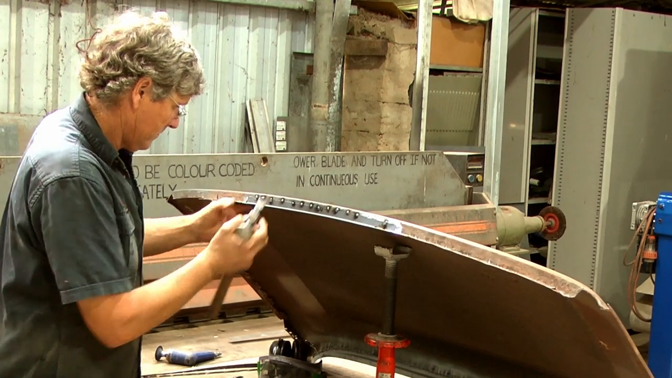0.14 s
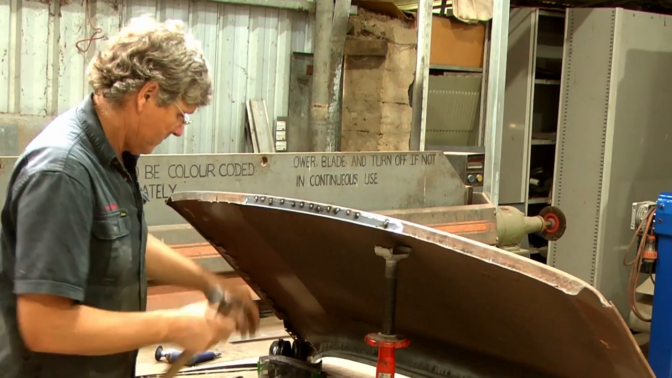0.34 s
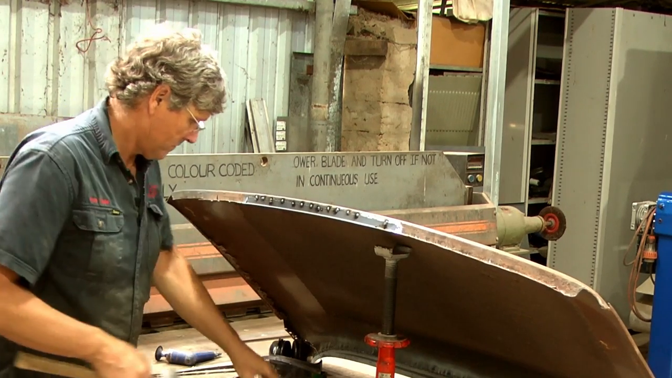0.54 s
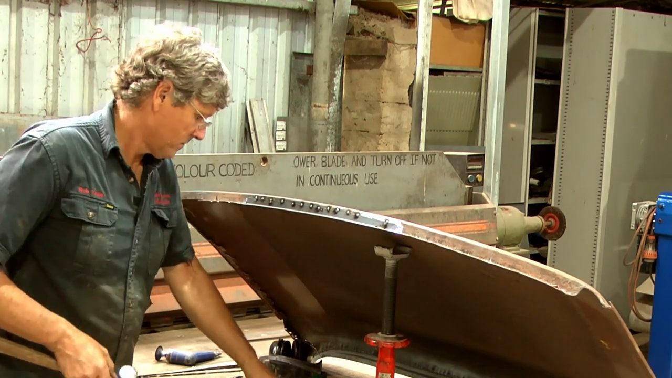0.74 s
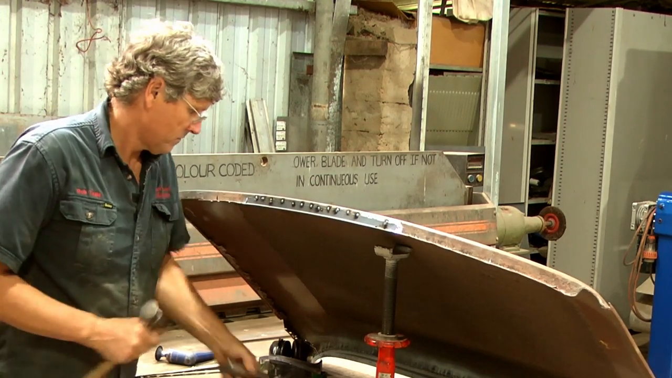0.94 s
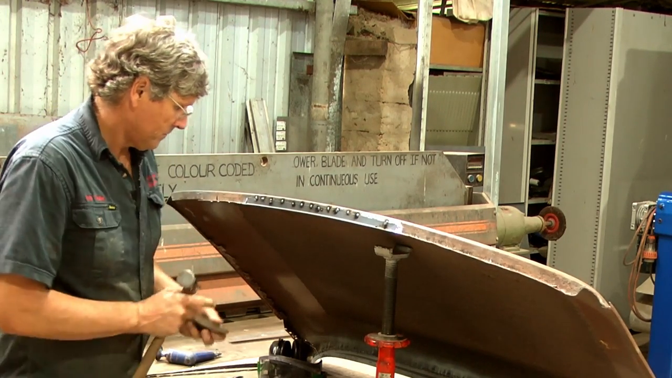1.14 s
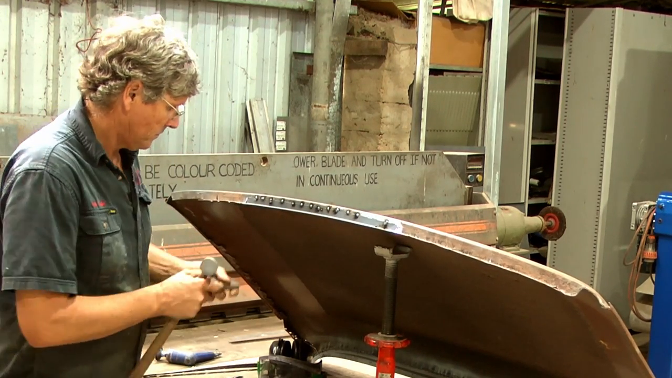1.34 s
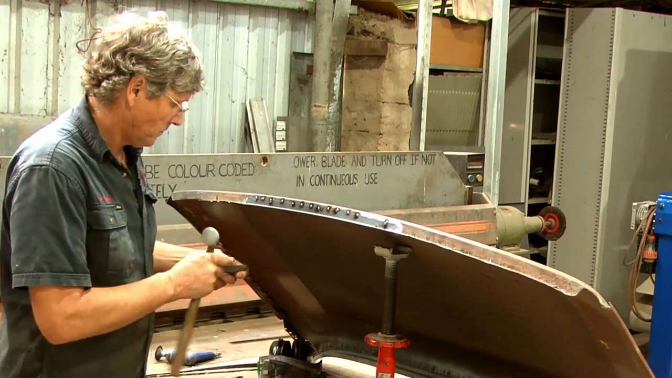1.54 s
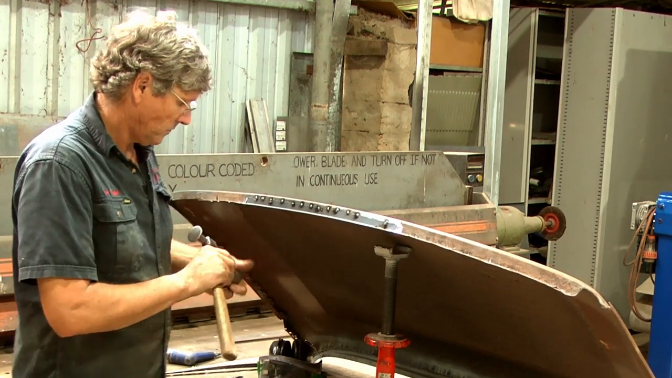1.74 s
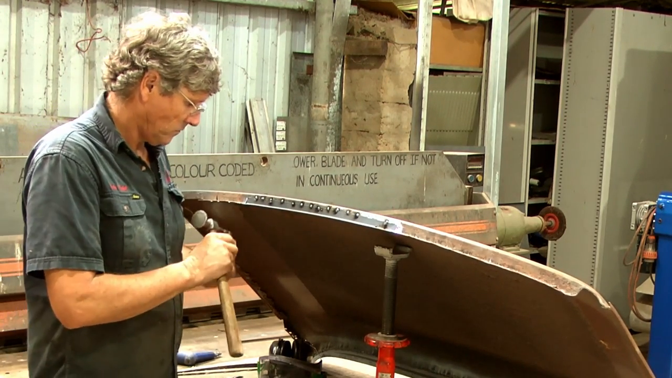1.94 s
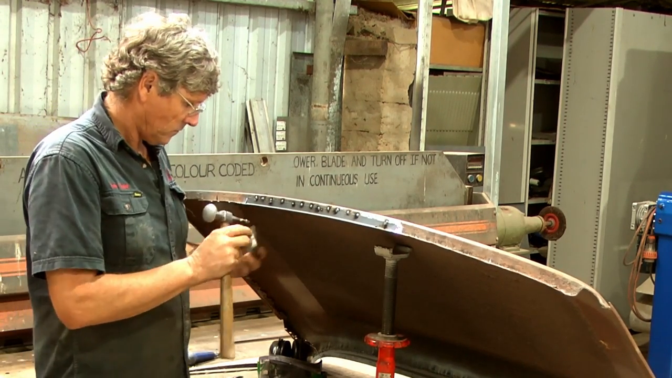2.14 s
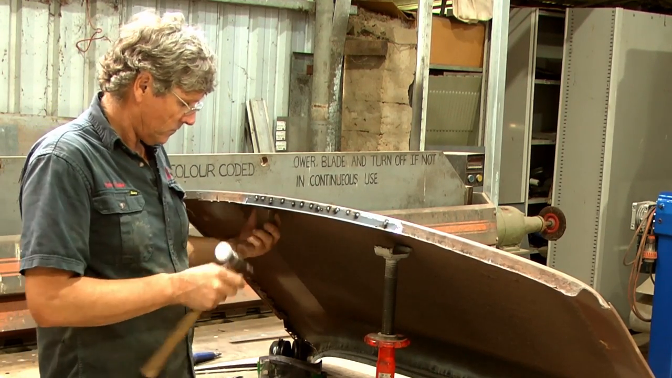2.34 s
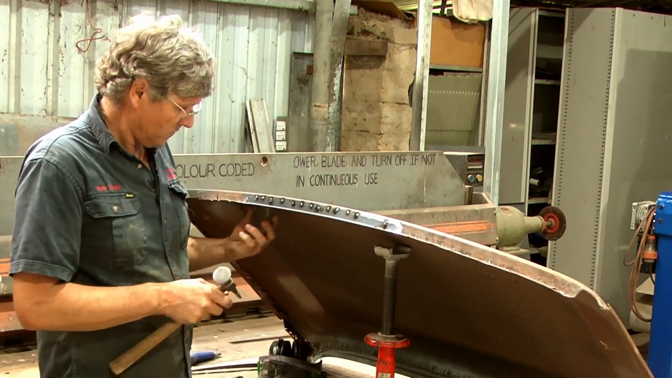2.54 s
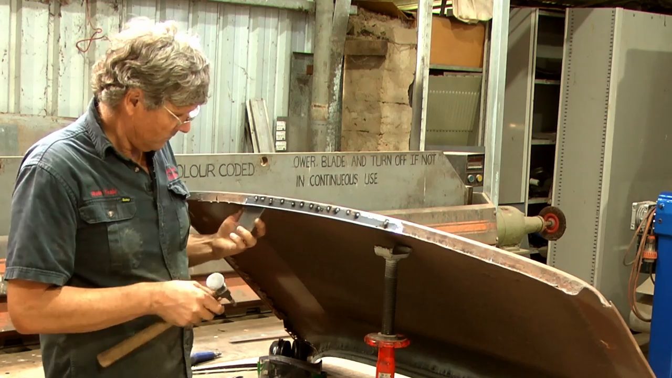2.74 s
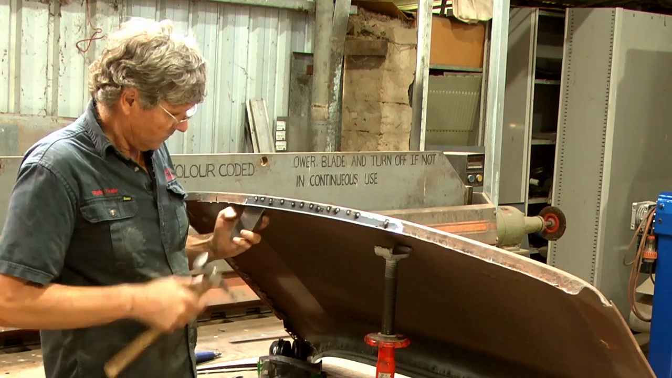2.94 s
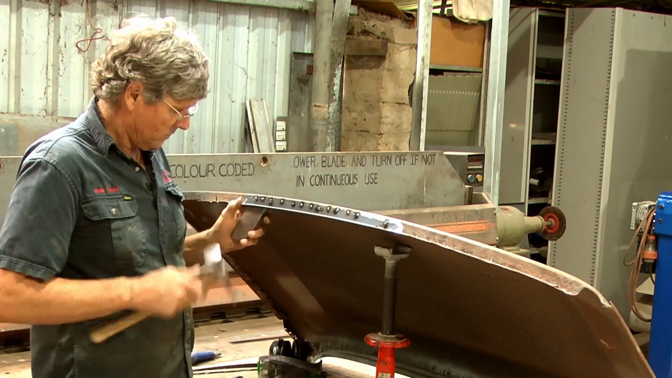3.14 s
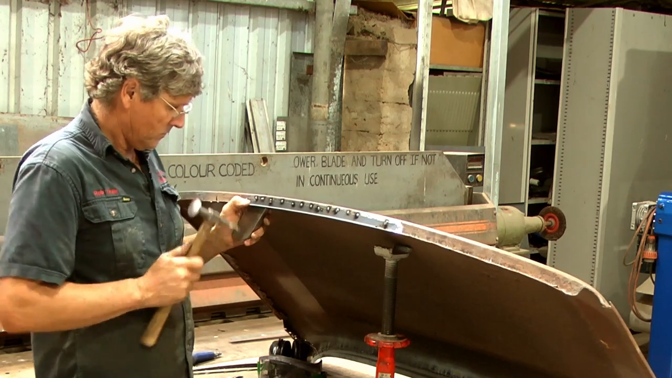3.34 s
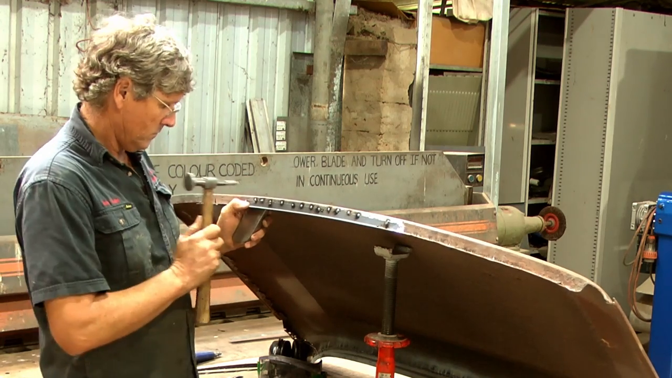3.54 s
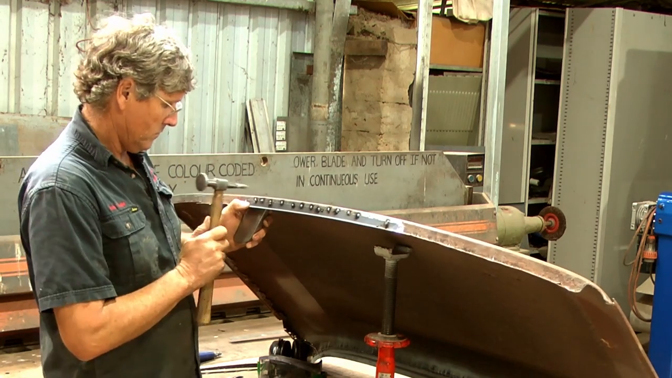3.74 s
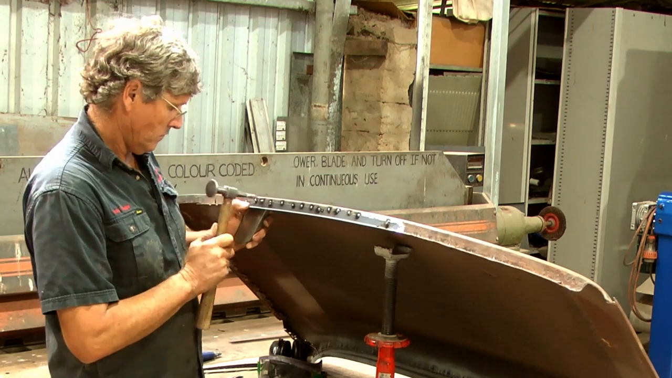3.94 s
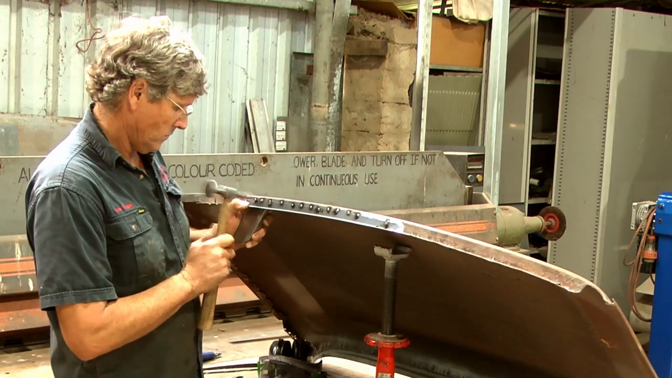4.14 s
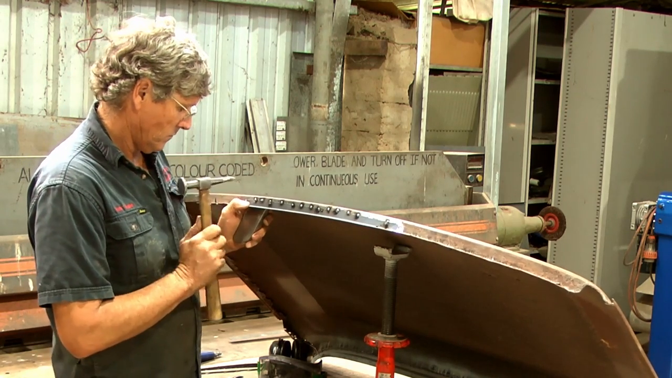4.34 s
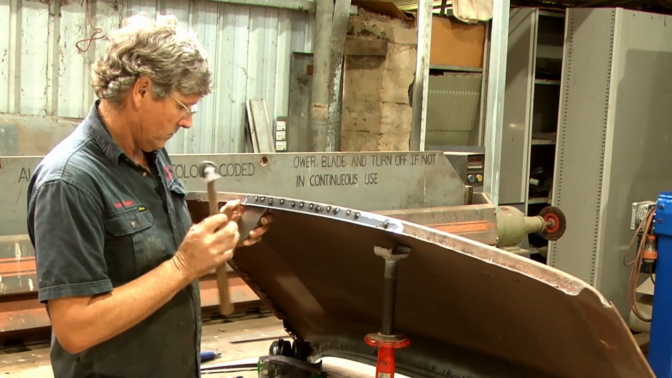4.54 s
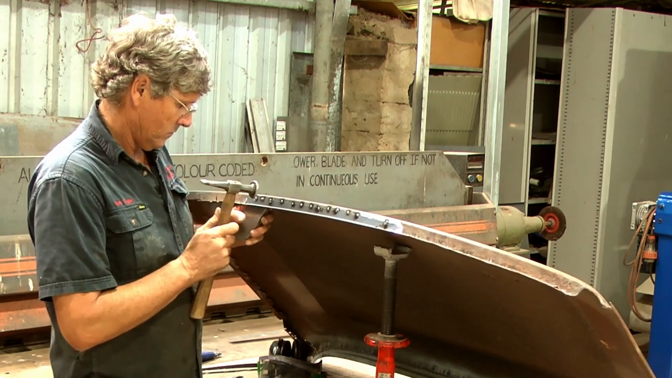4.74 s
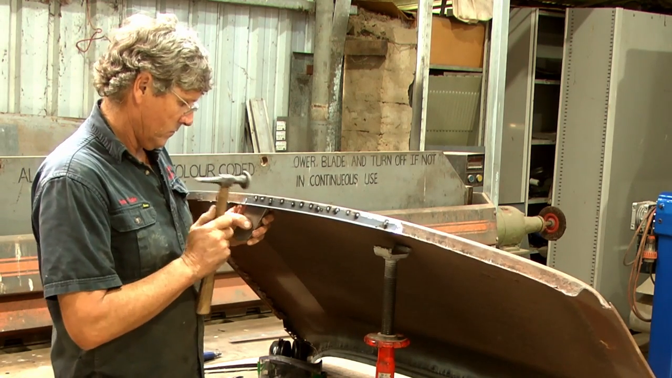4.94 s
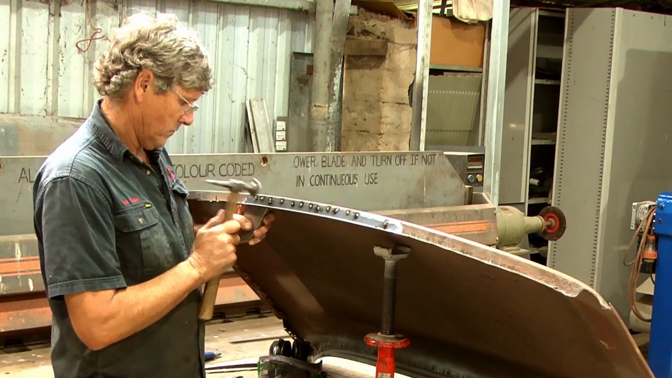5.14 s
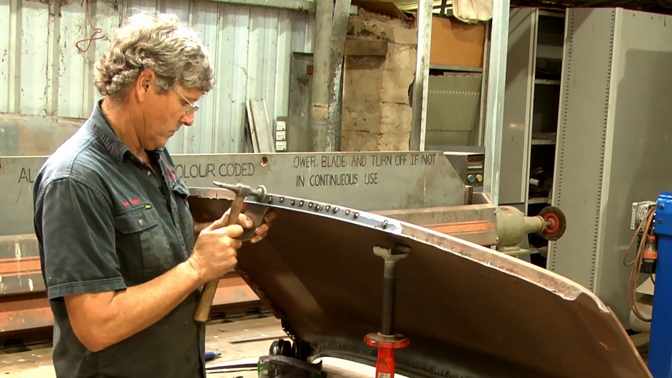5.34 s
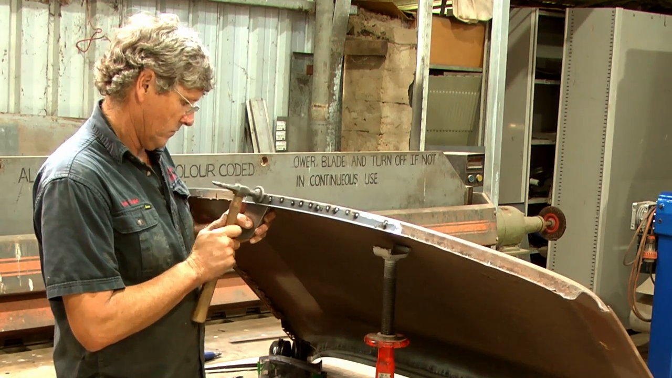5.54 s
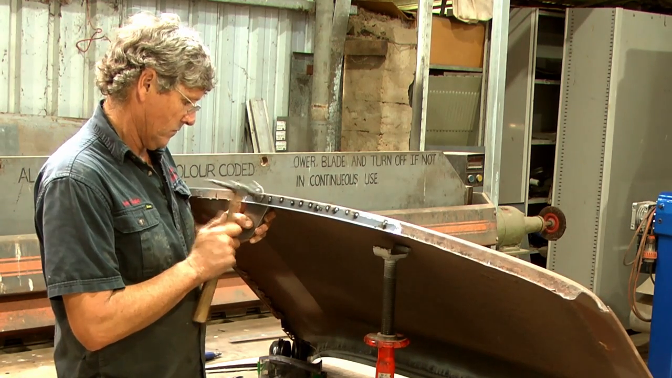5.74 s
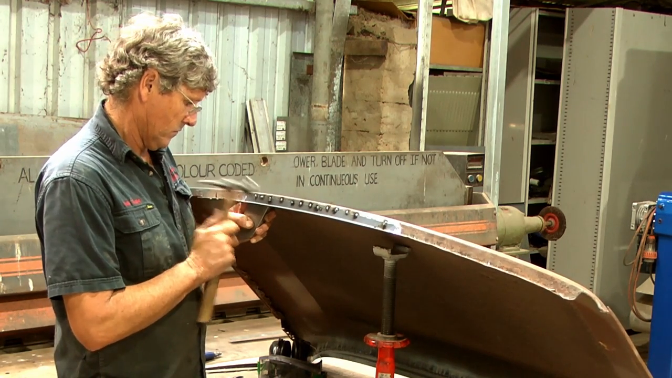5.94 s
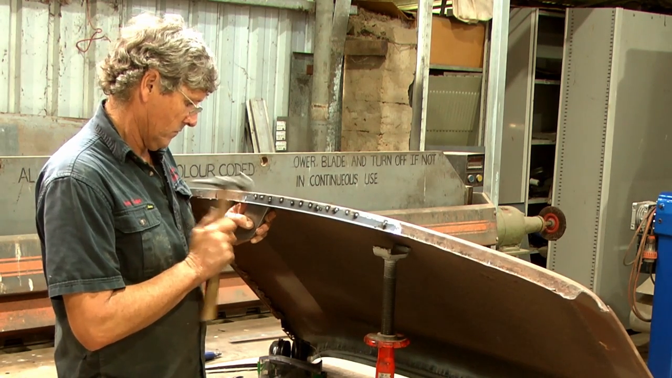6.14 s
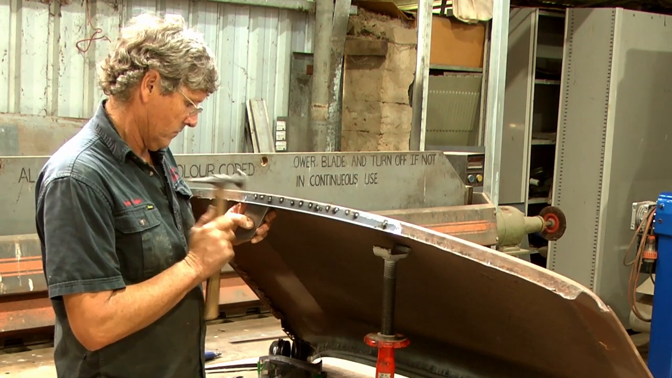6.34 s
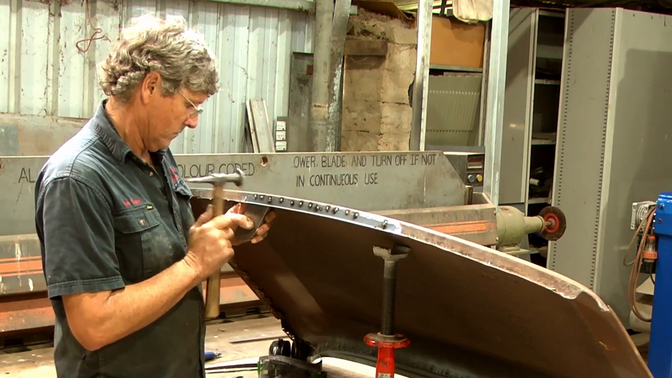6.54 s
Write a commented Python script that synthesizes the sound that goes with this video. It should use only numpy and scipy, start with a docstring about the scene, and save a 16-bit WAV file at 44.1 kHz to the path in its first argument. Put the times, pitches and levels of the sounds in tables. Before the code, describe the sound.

Soft shuffles and hand rubs on sheet steel, light tool knocks, a tiny squeak, two hard hammer blows, then eight rapid clanging strikes in an echoing workshop.

```python
"""In a workshop with a machine humming far off, ever fainter, feet shift and hands rub over sheet steel.
Then tools knock lightly on the panel, a short squeak follows, and two firm hammer blows land.
After more rubs and one light knock comes a fast run of eight hard blows, each with a dolly held behind the sheet.
Blows and knocks are dying noise bands and tones; rubs, feet and air are shaped noise; hum and squeak are
wavering sines. The hall answers with an echo, and the near microphone overloads."""
import sys
import numpy as np
from scipy import signal
from scipy.fft import rfft, irfft, next_fast_len
from scipy.io import wavfile
from scipy.ndimage import uniform_filter1d

SR = 44100
rng = np.random.default_rng(int(sys.argv[2]) if len(sys.argv) > 2 else 0)


def generate_wav(sig):
    """Save sig (samples, or channels by samples) to the path in sys.argv[1] as 16-bit PCM at SR."""
    pcm = np.round(np.clip(np.atleast_2d(sig).T, -1, 1) * 32767).astype(np.int16)
    wavfile.write(sys.argv[1], SR, pcm)


N = 294926
RING = np.arange(65536) / SR  # time axis of one ringing sound, in seconds

# the panel's lasting modes: (frequency [Hz], level with the dolly loose [dB],
# level with the dolly pressed home [dB], time to fall 60 dB [s])
PANEL_MODES = [(57.3, -52.5, -41, 0.84), (92.84, -27, -42.5, 1.95), (119.8, -27, -29, 1.4),
               (182.9, -27.5, -27, 0.96), (194, -45, -17.5, 0.76), (232.5, -37.5, -30, 0.62),
               (287, -18.5, -20.5, 0.44), (335.6, -22, -29.5, 0.28), (396.3, -14, -35, 0.86),
               (449.2, -11.5, -8.5, 0.24), (505, -19, -24, 0.7), (626, -28, -24.5, 1), (699, -7, -13, 0.27),
               (740, -22.5, -24.5, 0.94), (776, -27.5, -32, 0.53), (900, -27, -20.5, 0.52),
               (973, -35.5, -19.5, 0.39), (1045, -55, -22, .4), (1190, -42.5, -24, 0.25),
               (1287, -44, -40.5, 3), (1430, -37.5, -23, 0.53), (1637, -31, -22, 0.61),
               (1756, -42.5, -23, 0.29), (2190, -45, -34.5, 0.3), (2730, -35.5, -33.5, .3),
               (3060, -26, -25.5, 0.32)]
# the free ring of the dolly: (frequency [Hz], level [dB], time to fall 60 dB [s])
DOLLY_MODES = [(2930, -7.5, 0.5), (3080, -12.5, 0.31), (3660, -27, 0.15), (4900, -3.5, 0.27),
               (6170, -24.5, 0.11), (8193, -7, 0.12), (10600, -7.5, 0.069)]


def amp(db):
    """Turns decibels into gain."""
    return 10 ** (np.asarray(db) / 20)


def unit(x):
    """Scales a sound to rms 1."""
    return x / np.sqrt(np.mean(x ** 2) + 1e-20)


def read(points, hz):
    """Joins (frequency [Hz], value) points along a log-frequency axis."""
    f, value = np.transpose(points)
    return np.interp(np.log(hz + 1), np.log(f + 1), value)


def curve(points):
    """Joins (time [s], value) points over the whole scene."""
    times, values = np.transpose(points)
    return np.interp(np.arange(N) / SR, times, values)


def add(mix, s, sound):
    """Mixes a sound in at time s."""
    part = mix[max(round(s * SR), 0):][:len(sound)]
    part += sound[:len(part)]


def fade(t60):
    """A free decay of 60 dB in t60 seconds."""
    return np.exp(-np.log(1000) * RING / t60)


def noise(colour):
    """Steady noise of rms 1 with a given spectrum."""
    spectrum = rfft(rng.standard_normal(N))
    gain = amp(read(colour, np.fft.rfftfreq(N, 1 / SR)))
    return unit(irfft(spectrum * gain, N))


def drift(rate):
    """A random wander of rms 1 that heads for `rate` new values a second, 4096 values at most."""
    knots = rng.standard_normal(4096)
    return unit(np.interp(np.arange(N) / SR * rate, np.arange(len(knots)), knots))


def dying_bands(source, table):
    """Splits a source into bands (frequency [Hz], level [dB], t60 [s]), each dying at its own speed."""
    centres, levels, t60s = np.transpose(table)
    hz = np.fft.rfftfreq(len(RING), 1 / SR)
    spectrum = rfft(source) * amp(read(np.c_[centres, levels], hz))
    shares = [read(np.c_[centres, one], hz) for one in np.eye(len(centres))]
    return np.array([irfft(spectrum * share) * fade(t60) for share, t60 in zip(shares, t60s)])


def partials(modes):
    """One dying complex tone for each mode (frequency [Hz], level [dB], t60 [s])."""
    return np.array([amp(db) * fade(t60) * np.exp(2j * np.pi * hz * RING) for hz, db, t60 in modes])


def ring(tones, spread_db=3.5):
    """Each contact lands on a new spot and so shares its energy anew among the modes."""
    levels = amp(spread_db * rng.standard_normal(len(tones)))
    phases = np.exp(2j * np.pi * rng.random(len(tones)))
    return ((levels * phases) @ tones).real


def workshop(waver=0.0038, air_db=-58):
    """Air noise and the hum of a distant machine, whose tones all waver in pitch together."""
    # the machine's tones: (frequency [Hz], rms level before the swell [dB])
    hum_tones = [(360.7, -60), (716.0, -73.5), (1077, -75.5), (1437, -77), (1798, -79), (2514, -96),
                 (3553, -83)]
    # slow swell of the hum: (time [s], gain [dB])
    hum_swell = [(0, 3), (2.3, 1.5), (3.7, 1), (6.6, -7.5)]
    # spectrum of the air noise: (frequency [Hz], level per Hz [dB])
    air_colour = [(15, -56.5), (25, -20.5), (170, -12.5), (309, -3), (363, -9.5), (416, -7), (560, -10),
                  (624, -9), (1330, -19.5), (1840, -17), (2110, -21.5), (3250, -22), (16000, -60)]
    turns = np.cumsum(1 + waver * drift(rate=8.2)) / SR
    hum = sum(amp(db) * np.sqrt(2) * np.sin(2 * np.pi * hz * turns) for hz, db in hum_tones)
    air = amp(air_db + 0.5 * drift(rate=8)) * noise(air_colour)
    return hum * amp(curve(hum_swell)) + air


def hall(x, near_db=-9.5, walls_s=0.027, bounce_s=0.0072, bounce_db=-13.0, count=22):
    """A bounce off the floor, then a diffuse field that stores each band's energy and lets it die away."""
    # the echo: (frequency [Hz], level [dB], time to fall 60 dB [s])
    echo = np.array([(60, -8.5, 3.1), (199, -5, 1.04), (550, -10, 1.35), (1400, -7.5, 0.97),
                     (2610, -10, 1.39), (4470, -14, 0.93), (7500, -17, 0.81), (14000, -17, .4)])
    size = 32  # samples per step of the slow energy curves
    lag = RING[::size]
    # machines answer first, then walls
    arrival = np.interp(lag, [0.004, 0.012, walls_s * 0.76, walls_s], [0, amp(near_db), amp(near_db), 1])
    edges = np.geomspace(45, 17000, count + 1)
    out = np.zeros(N)
    for lo, hi in zip(edges, edges[1:]):
        band = signal.butter(3, [lo, hi], "band", fs=SR, output="sos")
        centre = np.sqrt(lo * hi)
        db, t60 = read(echo[:, [0, 1]], centre), read(echo[:, [0, 2]], centre)
        power = uniform_filter1d(signal.sosfilt(band, x) ** 2, size)[::size]
        decay = (arrival * fade(t60)[::size]) ** 2 / np.sum(fade(1.0)[::size] ** 2)
        stored = np.sqrt(abs(signal.fftconvolve(power, decay)[:len(power)]))
        level = np.interp(np.arange(N) / size, np.arange(len(stored)), stored)
        scatter = unit(signal.sosfilt(band, rng.standard_normal(N)))
        out += amp(db) * level * scatter
    add(out, bounce_s, amp(bounce_db) * x)
    return out


def footsteps():
    """Feet shift: each dull push of a sole on the floor is soft-edged noise whose bands die away."""
    # pushes: (time [s], level [dB])
    steps = [(0.265, -57.5), (0.314, -59.5), (0.689, -48), (0.761, -54), (0.815, -53), (1.074, -69),
             (1.332, -78), (1.501, -66)]
    # sound of the sole: (frequency [Hz], level per Hz [dB], time to fall 60 dB [s])
    sole = [(25, -23, 0.17), (65, -5, 0.14), (160, 3.5, 0.17), (320, -1.5, 0.1), (600, -12, 0.12),
            (1500, -36, .06), (7900, -62, .05)]
    out = np.zeros(N)
    for s, db in steps:
        bands = dying_bands(rng.standard_normal(len(RING)), sole)
        thud = bands.sum(0) * (1 - fade(0.039))
        add(out, s, amp(db) * thud / np.std(thud[:SR // 20]))  # level set over the first 50 ms
    return out


def stroke(s, length, rise=0.48, edge_db=-25):
    """The hand speeds up for a share `rise` of the stroke, is fastest at time s, and slows again."""
    lag = (np.arange(N) / SR - s) / length
    return amp(np.maximum(edge_db * np.maximum(-lag / rise, lag / (1 - rise)), -120))


def sliding(grain_db=1.5, grit_db=0.5, sing_db=-27.0, sing_width_hz=32.0, sing_s=0.16,
            free_hz=8200, mute_db_per_octave=13.0, grip_db=-71):
    """Skin and cloth catch unevenly on the steel and faintly stir the dolly's ring."""
    # strokes of hand and sleeve: (time at the fastest point [s], length [s], level [dB], extra hiss [dB])
    rubs = [(0.025, .1, -66, 0), (0.505, 0.2, -59.5, -13), (0.818, 0.098, -55.5, -12),
            (0.985, 0.36, -58, -3), (1.396, 0.27, -70, 5), (1.7, 0.33, -55, 0.5), (1.827, .3, -66, -2),
            (1.948, .18, -70, 14), (2.695, 0.12, -52.5, 3), (2.916, .07, -67.5, 11), (3.05, .2, -66.5, 9.5),
            (3.156, 0.18, -53.5, -6.5), (3.3, 0.12, -57, 2), (3.424, 0.27, -65, 1), (4.67, 0.18, -58, -1),
            (4.75, 0.12, -62, 4.5)]
    # spectrum of the rubbing: (frequency [Hz], level per Hz [dB])
    rub_colour = [(150, -11), (700, 4), (1800, -2.5), (4000, 3.5), (6500, -7.5), (11000, -17),
                  (16000, -24.5)]
    # borders of the three parts: body below, scrape between, hiss above: two frequencies [Hz]
    split_hz = (2500, 6000)
    rub = noise(rub_colour)
    upper, top = (signal.sosfiltfilt(signal.butter(2, hz, "high", fs=SR, output="sos"), rub)
                  for hz in split_hz)
    body, scrape, hiss = np.full((3, N), amp(grip_db))  # the fingers never rest quite still on the tools
    for s, length, db, hiss_db in rubs:
        swell = amp(db) * stroke(s, length)
        body += swell * amp(4 + 3.6 * (db + 55))  # the firmer the stroke, the more the sheet's low voice joins
        scrape += swell
        hiss += swell * amp(hiss_db)
    sing = np.zeros(N)
    for hz, db, _ in DOLLY_MODES:
        # the grip leaves one high mode free and mutes the rest
        free_db = db - mute_db_per_octave * abs(np.log2(hz / free_hz))
        sing += amp(free_db) * drift(rate=sing_width_hz) * np.sin(2 * np.pi * hz * np.arange(N) / SR)
    keep = np.exp(-1 / (sing_s * SR))
    stirred = signal.lfilter([1 - keep], [1, -keep], hiss)  # the ring outlasts the stroke
    catches_db = grain_db * drift(rate=250) + grit_db * drift(rate=830)
    rubbing = (rub - upper) * body + (upper - top) * scrape + top * hiss
    return rubbing * amp(catches_db) + amp(sing_db) * stirred * unit(sing)


def squeak(hz=3720, level_db=-58.0, waver=0.0097):
    """The dolly drags on the sheet: steel sticks and slips on steel, heard as a brief wavering tone."""
    # when it drags: start [s], end [s]
    drag_s = (3.255, 3.335)
    start, end = drag_s
    swell = curve([(start, 0), ((start + end) / 2, 1), (end, 0)])
    turns = hz * np.cumsum(1 + waver * drift(rate=340)) / SR
    return amp(level_db) * swell * np.sin(2 * np.pi * turns)


def strike(tones, bass_db, treble_db, pressure, rise_s, sheet_db=10.0, likeness=0.45, spread_s=0.0035):
    """The panel's answer to one contact: a dense clang and its lasting modes."""
    # the sheet's dense, short-lived modes: (frequency [Hz], level per Hz [dB], time to fall 60 dB [s])
    sheet = [(50, -33.5, 0.46), (114, -9, 0.28), (226, -5, 0.3), (451, 1, 0.3), (740, 3.5, 0.16),
             (1200, -1.5, 0.14), (2340, -4, 0.097), (3960, -1, 0.067), (7100, -10.5, 0.055),
             (11000, -21.5, 0.053), (16000, -26, .04)]
    modes, pattern = tones
    sheet_hz = np.transpose(sheet)[0]
    mode_hz, loose_db, pressed_db, _ = np.transpose(PANEL_MODES)
    touch = [(200, bass_db), (450, 0.0024), (750, 0.00033), (2200, treble_db)]  # (Hz, dB)
    # all contacts share part of one noise pattern, the rest is new each time
    source = likeness * pattern + np.sqrt(1 - likeness ** 2) * rng.standard_normal(len(RING))
    # low bending waves travel slowly, so the clang sinks in pitch as the whole sheet takes it up
    swell = 1 - np.exp(-RING / (spread_s * 400 / sheet_hz[:, None] + 1e-5))
    clang = amp(read(touch, sheet_hz)) @ (swell * dying_bands(source, sheet))
    clang = (1 - np.exp(-RING / rise_s)) * amp(sheet_db) * clang
    mode_db = read(touch, mode_hz) + loose_db + pressure * (pressed_db - loose_db)
    lasting = ring(modes * amp(mode_db)[:, None]) * (1 - np.exp(-RING / spread_s))
    return clang, lasting


def metalwork(ping_t60=0.012, squeeze=0.026, soft_hz=5500, held_t60=2.5):
    """Hammer blows and light knocks set the panel ringing; returns the sharp sounds and the lasting ring."""
    # hammer blows: (time [s], force [dB], bass [dB], treble [dB], frequency the ping of hammer on dolly
    # sinks to [Hz], ping level [dB], pressure of the dolly [0-1])
    blows = [(3.9788, -5, -1.5, -5.5, 4180, -2.5, 0.13), (4.2228, -1, -6, -5, 4090, -2, 0.32),
             (5.1457, -3, -1.5, 0.5, 4690, 3.5, 0.88), (5.3794, 0, -2, -3, 4180, 3, 0.87),
             (5.6000, -2, 1, 0, 4300, -3, 0.93), (5.8225, -3.5, 0.5, 2, 4080, 3, 0.8),
             (6.0335, -1, -2, -3, 4380, -4, 0.82), (6.2432, -1.5, -2, 0.5, 4020, 4.5, 0.77),
             (6.4528, -3.5, 2.5, 2, 3860, 6, 0.75), (6.6638, -3, -3, 0, 4070, 14.5, 0.85)]
    # tools knocking on the work: (time [s], force [dB], bass [dB], treble [dB], clink of the dolly [dB])
    knocks = [(2.122, -63, 1, 12.5, -3), (2.403, -25, 11.5, -8.5, -46), (2.425, -30, 18, -13, -39),
              (2.483, -32.5, 20, -20, -34), (2.558, -56.5, 33, 9, -28), (2.705, -29.5, 5, -9, -34),
              (2.7159, -21, -12, 1.5, -19), (2.742, -29, 13.5, 3.5, -46), (2.84, -30.5, 9.5, -3.5, -24),
              (2.886, -49, -3, 0, -11), (3.097, -40.5, 2, -18, -30), (3.170, -39, 10, -11, -30),
              (3.344, -40.5, 7.5, -0.5, -31), (3.394, -52.5, 12, 4, -24), (5.019, -45.5, 3, -2.5, -36)]
    sharp, lasting = np.zeros((2, N))
    panel = partials([(hz, 0, t60) for hz, _, _, t60 in PANEL_MODES])
    tones = panel, rng.standard_normal(len(RING))
    dolly = partials(DOLLY_MODES)
    gentle = signal.butter(2, soft_hz, fs=SR)  # a gentle contact lasts longer and so lacks the top
    for s, force_db, bass_db, treble_db, clink_db in knocks:
        clang, modes = strike(tones, bass_db, treble_db, pressure=0.6, rise_s=0.0011, spread_s=0.0032)
        clink = amp(clink_db) * ring(dolly)
        add(sharp, s, amp(force_db) * (signal.lfilter(*gentle, clang) + clink))
        add(lasting, s, amp(force_db) * modes * fade(held_t60))  # a hand on the sheet damps it
    for s, force_db, bass_db, treble_db, ping_hz, ping_db, pressure in blows:
        clang, modes = strike(tones, bass_db, treble_db, pressure, rise_s=0.00017)
        # steel meets steel through the sheet: a ping, choked at once by the hand,
        # that sinks as the contact opens
        turns = np.cumsum(ping_hz * (1 + squeeze * fade(ping_t60 / 2))) / SR
        ping = amp(ping_db) * fade(ping_t60) * np.sin(2 * np.pi * turns)
        add(sharp, s, amp(force_db) * (clang + ping))
        add(lasting, s, amp(force_db) * modes)
    return sharp, lasting


def scene(port_noise_db=-76.0):
    """All sources reach one microphone; only a faint noise differs between the two channels."""
    # spectrum of each channel's own noise: (frequency [Hz], level per Hz [dB])
    port_noise = [(25, -4), (100, -2), (400, 6), (1000, -28.5), (6000, -28.5), (16000, -35)]
    sharp, lasting = metalwork()
    direct = sharp + sliding() + squeak() + footsteps()
    mono = direct + hall(direct) + lasting + workshop()
    return mono + amp(port_noise_db) * np.array([noise(port_noise), noise(port_noise)])


def record(dry, ceiling_db=-7.5, knee=6.8, edge_hz=16150):
    """The input overloads, with more headroom in the presence band; then channel balance and band limit."""
    # the input's extra headroom: centre [Hz], headroom [dB], relative half width
    presence = (4300, 7.3, .62)
    # channel balance: (frequency [Hz], left minus right [dB])
    balance = [(30, -.85), (120, -.7), (500, -.45), (1000, -.25), (4000, -.35), (14000, -.2)]
    hz, db, width = presence
    w, g = 2 * np.pi * hz / SR, amp(db / 2)
    k = np.sin(w) * width
    b = [1 + k * g, -2 * np.cos(w), 1 - k * g]
    a = [1 + k / g, -2 * np.cos(w), 1 - k / g]
    drive = signal.lfilter(a, b, dry)  # lower the presence band ahead of the overload
    flattened = drive / (1 + abs(drive / amp(ceiling_db)) ** knee) ** (1 / knee)
    restored = signal.lfilter(b, a, flattened)  # and lift it again
    size = next_fast_len(N + SR)
    lean_db = read(balance, np.fft.rfftfreq(size, 1 / SR)) / 2
    out = irfft(rfft(restored, size) * amp([lean_db, -lean_db]), size)[:, :N]
    low_pass = signal.firwin(255, edge_hz, window=("kaiser", 9), fs=SR)
    return signal.oaconvolve(out, low_pass[None], "same")


dry = scene()
out = record(dry)
generate_wav(out)
```